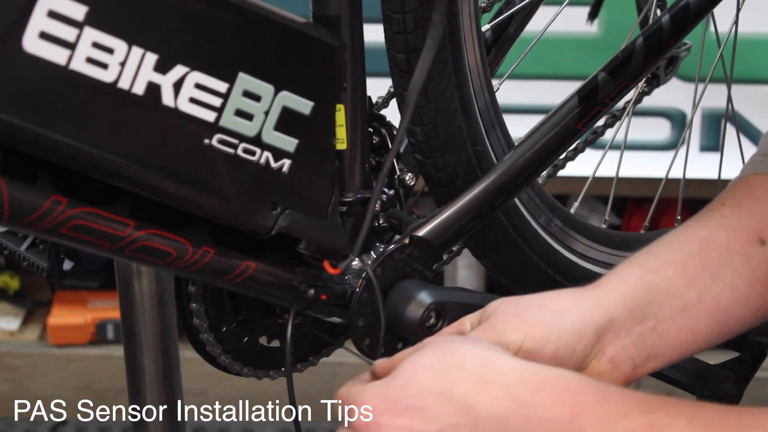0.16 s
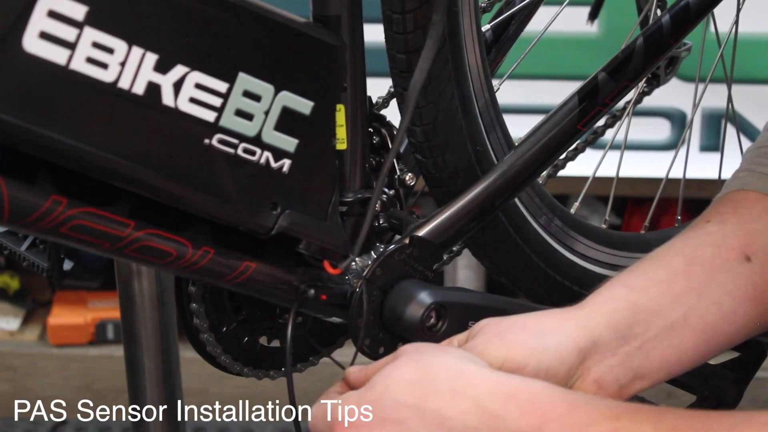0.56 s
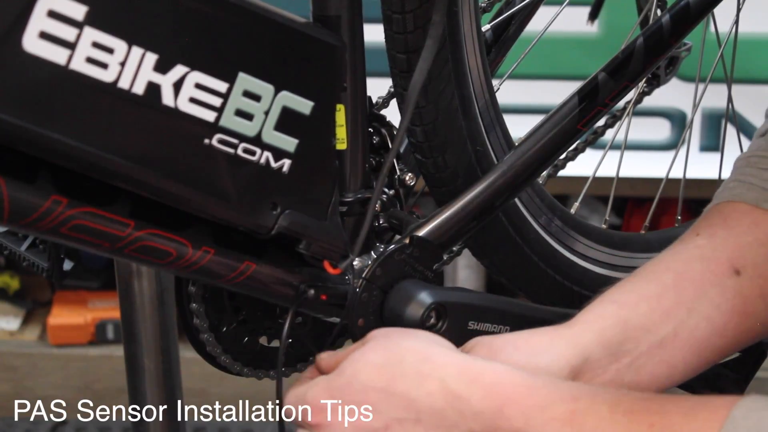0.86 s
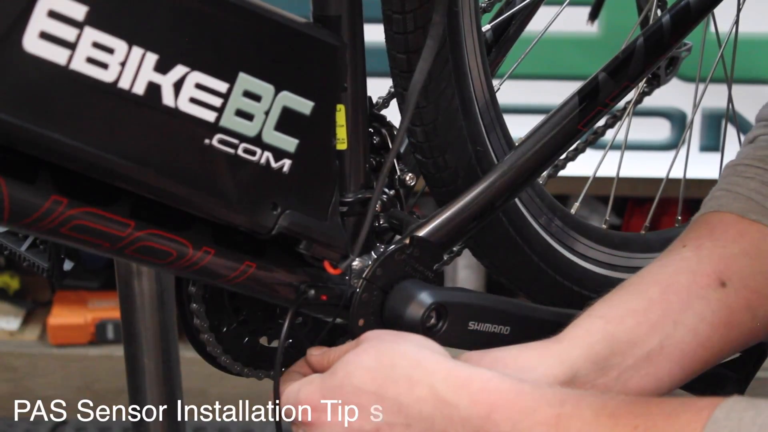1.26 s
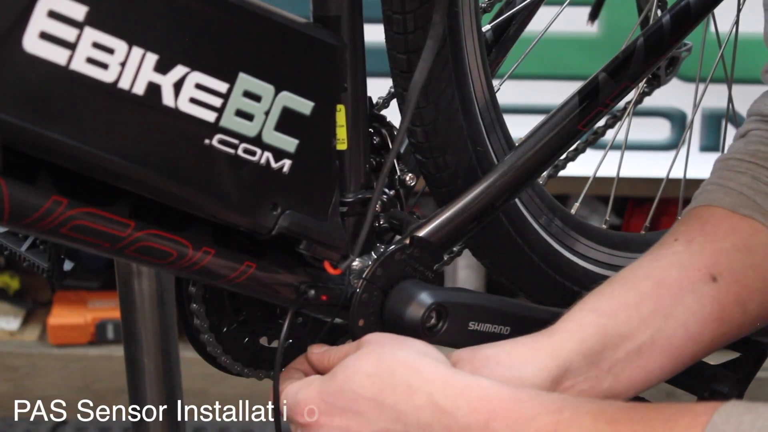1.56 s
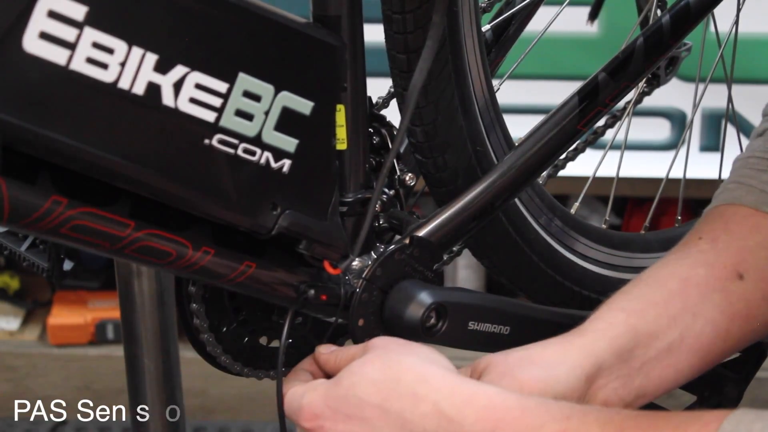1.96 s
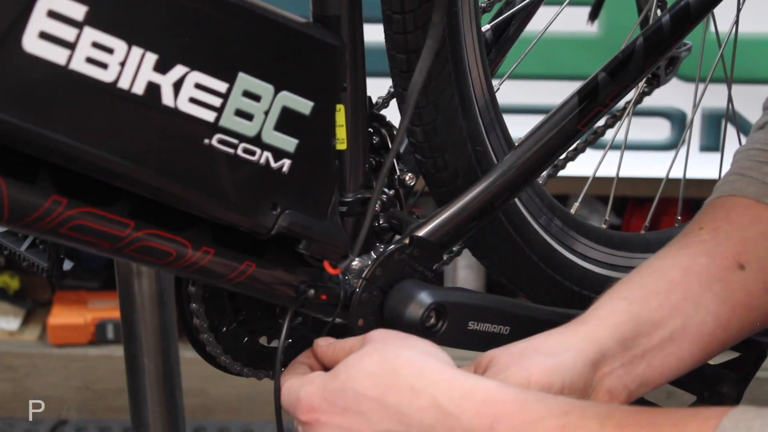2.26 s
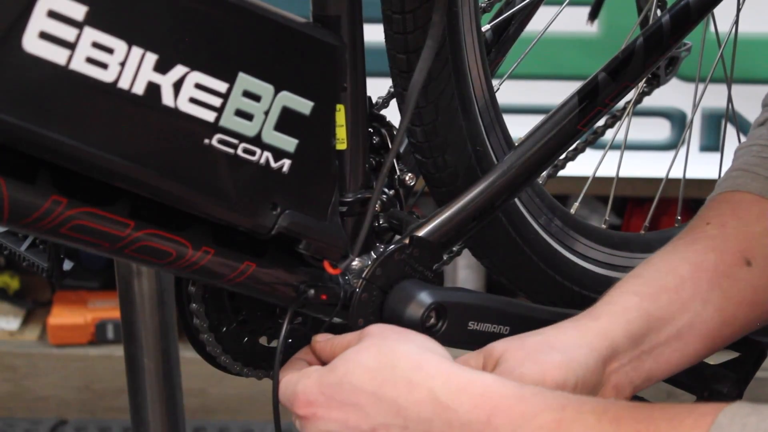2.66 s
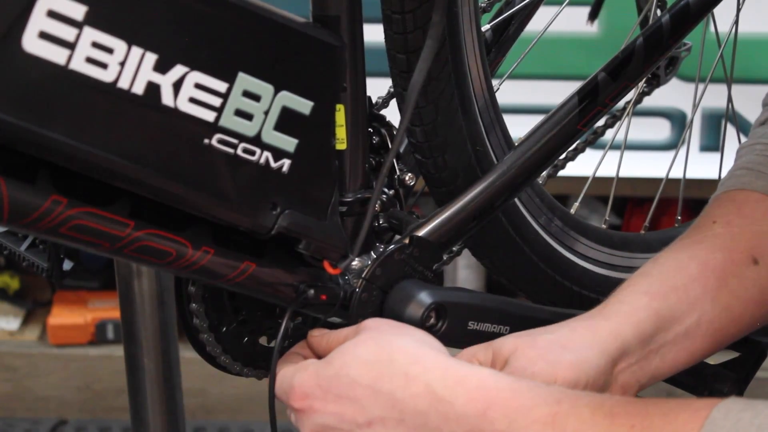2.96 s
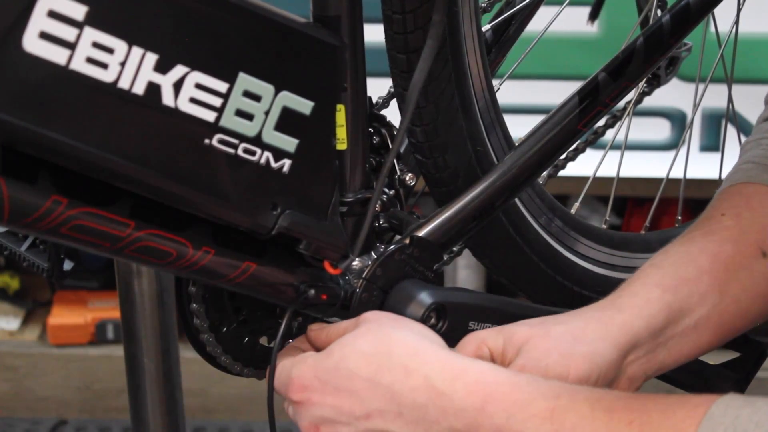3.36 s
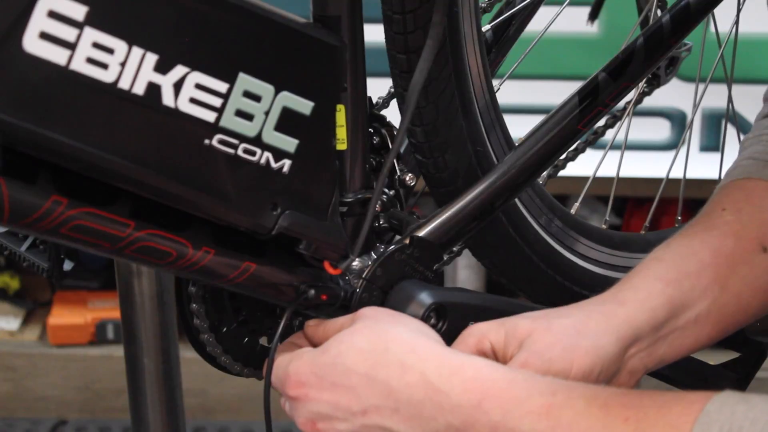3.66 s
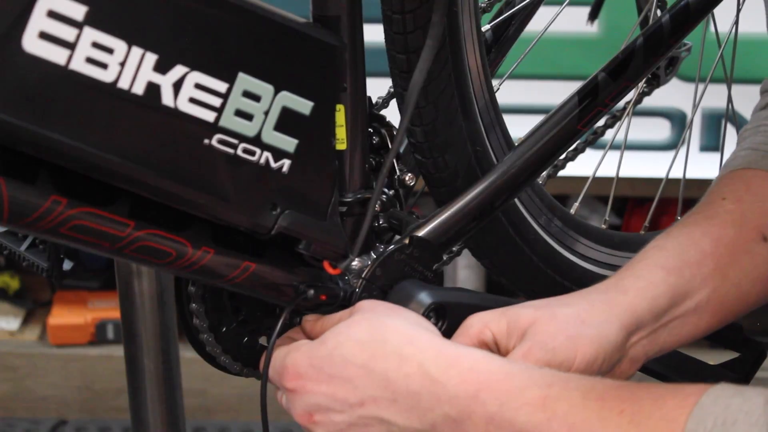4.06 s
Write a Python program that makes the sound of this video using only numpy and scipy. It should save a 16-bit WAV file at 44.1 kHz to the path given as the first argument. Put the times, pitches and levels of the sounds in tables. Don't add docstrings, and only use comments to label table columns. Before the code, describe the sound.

Quiet room air and low mains hum, then a plastic cable tie zips through its head: rapid runs of tiny, sharp, high clicks, densest just before one second. Isolated clicks follow, then hard snaps with taps on the frame, several shorter zips, and finally spaced, lighter single ticks. The microphone is close and dry, with short reflections off nearby surfaces and a small workshop tail.

```python
import sys
import numpy as np
from scipy import signal
from scipy.fft import rfft, irfft, next_fast_len
from scipy.io import wavfile
from scipy.ndimage import uniform_filter1d

SR = 44100
rng = np.random.default_rng(int(sys.argv[2]) if len(sys.argv) > 2 else 0)


def log_audio(samples):
    frames = np.atleast_2d(samples).T
    limited = np.clip(frames, -1, 1)
    pcm = np.round(limited * 32767).astype(np.int16)
    wavfile.write(sys.argv[1], SR, pcm)


def elevation(decibels):
    levels = np.asarray(decibels, float)
    return 10 ** (levels / 20)


N = 186013


def unit(x):
    return x / np.sqrt(np.mean(x ** 2) + 1e-20)


def along(points, hz):
    f, v = np.transpose(points)
    return np.interp(np.log(hz + 1), np.log(f + 1), v)


def filtered(x, response):
    m = next_fast_len(N + 8192)
    hz = np.fft.rfftfreq(m, 1 / SR)
    return irfft(rfft(x, m) * response(hz), m)[:N]


def noise(spectrum):
    return unit(filtered(rng.standard_normal(N), lambda hz: elevation(along(spectrum, hz))))


def creeping(shape):
    return unit(uniform_filter1d(rng.standard_normal(shape), size=5, axis=0))


# (frequency [Hz], level per Hz [dB])
AIR_SPECTRUM = [(12, -37), (20, -18), (96, -3.5), (499, -4.5), (678, -5.5), (897, -7.5), (1330, -6),
                (1860, -11), (2020, -12), (5680, -15), (6180, -14), (6720, -16.5), (16000, -21)]
# (frequency [Hz], line width [Hz], level [dB])
HUM_LINES = [
    (57.8, 1.26, -67),
    (120.5, 6.3, -71),
    (371.8, 9.8, -71),
    (717.5, 2.4, -69),
    (1127, 7.7, -76),
]


def background():
    x = elevation(-57.5) * noise(AIR_SPECTRUM)
    t = np.arange(N) / SR
    for hz, width, db in HUM_LINES:
        drift = np.cumsum(rng.standard_normal(N)) * np.sqrt(2 * np.pi * width / SR)
        x += elevation(db + 2.5) * np.sin(2 * np.pi * hz * t + drift)
    return x


# (time [s], level [dB])
RUB_LEVEL = [
    (0.0, -65),
    (0.042, -55),
    (0.09, -56.5),
    (0.122, -74),
    (0.14, -75),
]
# (frequency [Hz], level per Hz [dB])
RUB_SPECTRUM = [(1180, -29), (2000, 1), (2110, -16), (3520, 2), (5120, -3), (13100, 3), (16000, -4)]


def rub():
    s, db = np.transpose(RUB_LEVEL)
    level_db = np.interp(np.arange(N) / SR, s, db, right=-120)
    return elevation(level_db) * noise(RUB_SPECTRUM)


# (delay [s], level [dB])
REFLECTIONS = [(.0038, -15.5), (.0063, -11), (.0107, -15.5), (.0142, -34), (.0213, -37), (.0294, -50)]
# (frequency [Hz], T60 [s])
REVERBERATION = [(500, 0.47), (2000, 0.46), (5000, 0.33), (10000, 0.23), (15000, 0.24)]


def shop(x):
    out = np.zeros(N + SR)
    for delay, db in REFLECTIONS:
        out[round(delay * SR):][:N] += elevation(db) * x
    step, scatter_delay_s = SR // 12, .0015
    for a in range(0, N, step):
        hz, t, z = signal.stft(rng.standard_normal(SR // 2), SR, nperseg=128)
        slow = elevation(-60 * t / along(REVERBERATION, hz)[:, None])
        fast = elevation(5.0 - 60 * t / 0.021)
        tail = signal.istft(z * (slow + fast), SR, nperseg=128)[1]
        wet = signal.fftconvolve(x[a:a + step], tail / np.linalg.norm(tail))
        out[a + round(scatter_delay_s * SR):][:len(wet)] += elevation(-1.5) * wet
    return out[:N]


def early_rms(rows):
    return np.sqrt(np.mean(rows[:, :90] ** 2, axis=1, keepdims=True))


def ring(modes, ratio, scatter_db, detune, slip):
    t = np.arange(640) / SR
    draw = creeping((len(ratio), len(modes), 3))
    rows = np.zeros((len(ratio), len(t)))
    for k, (hz, db, t60) in enumerate(modes):
        pitch = hz * ratio * (1 + detune * draw[:, k, 0])
        phase = .3 * k ** 2 + 0.93 * draw[:, k, 2:]
        wave = np.sin(2 * np.pi * pitch[:, None] * (t - slip) + phase)
        rows += elevation(db + scatter_db * draw[:, k, 1:2] - 60 * t / t60) * wave
    rows *= np.clip(t / slip, 0, 1) ** 2
    return rows / early_rms(rows)


# (frequency [Hz], level [dB], T60 [s])
LOOP_MODES = [(1007, -21.5, 0.0088), (1540, -14, 0.0064), (1836, 6.5, 0.005), (2384, -4.5, 0.011),
              (2825, -5, 0.0061)]
# (time [s], pitch ratio [1])
LOOP_PITCH = [(0.3, 1.03), (1.1, 1.005), (1.8, 1), (2.3, 1.014), (2.9, 1.018), (3.5, 1.22), (4.2, 1.4)]


def loop(times, slip):
    ratio = np.interp(times, *np.transpose(LOOP_PITCH))
    return ring(LOOP_MODES, ratio, scatter_db=2.5, detune=.025, slip=slip)


# (frequency [Hz], level [dB], T60 [s])
STRAP_MODES = [(3435, 1, 0.0063), (3926, 4, 0.0065), (5200, 0, 0.0043), (6120, -4.5, 0.0052)]


def strap(times, slip):
    return elevation(-2.5) * ring(STRAP_MODES, np.ones(len(times)), scatter_db=2.5, detune=.015, slip=slip)


# (frequency [Hz], level [dB], T60 [s])
HEAD_MODES = [(7230, -7.5, 0.0033), (9050, 3, 0.0018), (9590, -1, 0.0028), (10850, -5, 0.0051)]


def head(times, slip):
    return elevation(-2.0) * ring(HEAD_MODES, np.ones(len(times)), scatter_db=1.5, detune=.025, slip=slip)


# (frequency [Hz], level [dB], T60 [s])
PAWL_MODES = [(11840, 0, 0.0032), (12600, 9, 0.0028), (13970, 4, 0.0037), (15200, 4, 0.0031),
              (14770, -1, 0.0043)]


def pawl(times, slip):
    return elevation(-3.0) * ring(PAWL_MODES, np.ones(len(times)), scatter_db=1.2, detune=0.024, slip=slip)


def crack_burst(shape, slip):
    t = np.arange(shape[1]) / SR
    hold_s, t60 = .0002, 0.0025
    crack = np.diff(creeping(shape), axis=1, n=2, prepend=0, append=0)
    crack *= elevation(-60 * (np.hypot(t - slip, hold_s) - hold_s) / t60)
    return elevation(-1.5) * crack / early_rms(crack)


def snaps(events, slip):
    s, db, loop_db, strap_db, head_db = np.transpose(events)[:, :, None]
    times = s[:, 0]
    rows = pawl(times, slip)
    rows += elevation(loop_db) * loop(times, slip)
    rows += elevation(strap_db) * strap(times, slip)
    rows += elevation(head_db) * head(times, slip)
    crack = crack_burst(rows.shape, slip)
    at = np.round((s - slip) * SR).astype(int) + np.arange(rows.shape[1])
    placed = [np.bincount(at.ravel(), (elevation(db) * part).ravel(), N + SR)[:N] for part in (rows, crack)]
    return np.array(placed)


# (time [s], pawl level [dB], then relative to it loop level [dB], strap level [dB], head level [dB])
TOUCHES = [
    (0.2434, -58, -8, 0, 0.5),
    (0.2884, -64, 0, 4, 15),
    (1.6747, -30.5, -3.5, 5.5, 1),
    (1.7451, -27, -13, -2.5, -2),
    (1.8604, -50.5, -4, 10, 5),
    (1.8798, -41.5, -11, -1, 3),
    (1.8982, -51, 7, 15.5, 2.1),
    (2.1651, -46.5, -3, 3, 0.5),
    (2.2012, -50, 7, 8, 2),
]


def touches():
    return snaps(TOUCHES, slip=0.00055)


# (start [s], length [s], teeth [count], slowing of the tooth gaps [log ratio], slower ends [log ratio])
STRAP_PULLS = [(.2974, .0857, 6, .31, .08), (.4672, .1018, 6, -.22, .18), (.6074, .0916, 7, .04, .54),
               (.7141, .0889, 11, -.33, -.06), (.8093, .1002, 12, .34, .16), (.9232, .1402, 13, .15, .42),
               (1.2084, .0425, 3, .29, 0), (1.6018, .0625, 4, .04, -.34), (1.672, .0531, 9, -.13, -.18),
               (1.7292, .0346, 5, .31, .14), (2.056, .0598, 6, .28, .1), (2.2249, .0753, 8, .35, -.12),
               (2.5007, .0834, 5, .29, .18), (2.728, .099, 6, .52, .12)]
SINGLE_TEETH = [1.3567, 1.402, 1.4761, 2.9084, 2.9844, 3.0644, 3.1474, 3.2139, 3.3128, 3.388, 3.5377,
                3.5899, 3.645, 3.7325, 3.8039, 3.945, 4.104]
# (time [s], snap level [dB], loop tension [dB], pressure of the tie on the frame [dB])
HAND_FORCES = [(.3, -26.5, -30, 2.5), (.65, -26, -24.5, -5), (.74, -26.5, -22.5, 0), (.85, -26, -20, -15),
               (1.06, -26.5, -16.5, -2), (1.48, -24, -19.5, -1.5), (1.655, -26, -17, 0.5),
               (1.675, -20, -21, 1), (1.7, -26, -14, 6.5), (1.76, -22.5, -11, 9), (2.1, -24.5, -15.5, 2.5),
               (2.26, -27.5, -13, 9), (2.55, -29.5, -13, 12), (2.735, -28.5, -14.5, 13.5),
               (2.8, -29, -14.5, 5), (2.95, -30.5, -14, 9.5), (3.56, -29.5, -14, 7.5),
               (4.1, -29.5, -11, 5.5)]


def teeth():
    times = list(SINGLE_TEETH)
    for start, length, count, slowing, ends in STRAP_PULLS:
        place = np.linspace(-1, 1, count - 1)
        gaps = np.exp(slowing * place + ends * place ** 2)
        times += list(start + length * np.cumsum(np.r_[0, gaps]) / gaps.sum())
    times = np.sort(times)
    s, *controls = np.transpose(HAND_FORCES)
    snap_db, tension_db, pressure_db = [np.interp(times, s, c) for c in controls]
    snap_db = snap_db + 0.53 * rng.standard_normal(len(times))
    strap_db = -18 + pressure_db
    head_db = -11.5 + 0.51 * pressure_db
    return snaps(np.transpose([times, snap_db, tension_db, strap_db, head_db]), slip=0.0005037)


def scene():
    rings, cracks = teeth() + touches()
    sent = elevation(-3) * rings + elevation(3) * cracks
    return (rings + cracks + shop(sent) + rub() + background())[None]


def band_limit(x):
    return signal.sosfilt(signal.butter(12, 17140, fs=SR, output="sos"), x)


# (frequency [Hz], level [dB])
TREBLE_END = [(15600, 0), (16000, -17), (17000, -19)]


def record(dry):
    top_hz, onset_top_hz = 15900, 17100
    onset_rise_db, onset_open_s = 19, .012
    x = filtered(dry[0], lambda hz: elevation(along(TREBLE_END, hz)) * (hz < onset_top_hz))
    steady = filtered(x, lambda hz: hz < top_hz)
    near, span = SR // 1000, round(onset_open_s * SR)
    before = np.roll(uniform_filter1d(x ** 2, span), span // 2 + near)
    onset = uniform_filter1d(x ** 2, near) > elevation(2 * onset_rise_db) * np.abs(before)
    opened = uniform_filter1d(1. * onset, span) > 1e-6
    gate = uniform_filter1d(1. * opened, span // 2)
    mix = (steady + gate * (x - steady))[None]
    return band_limit(mix)


dry = scene()
out = record(dry)
log_audio(out)
```